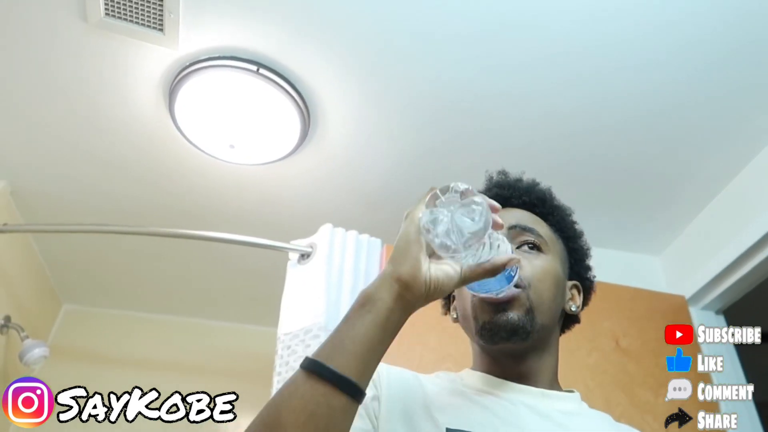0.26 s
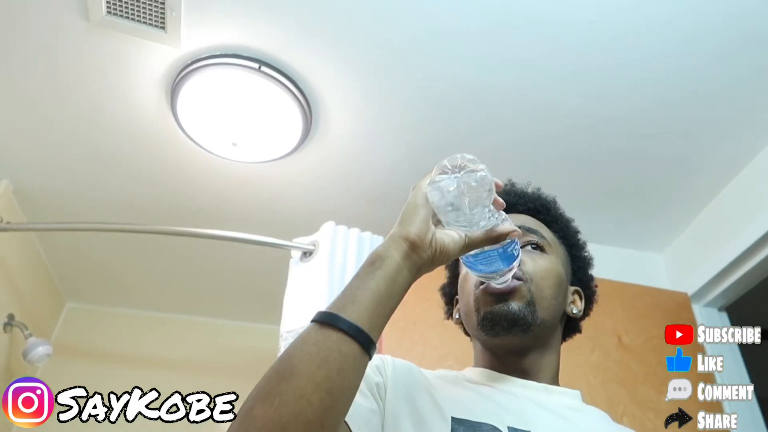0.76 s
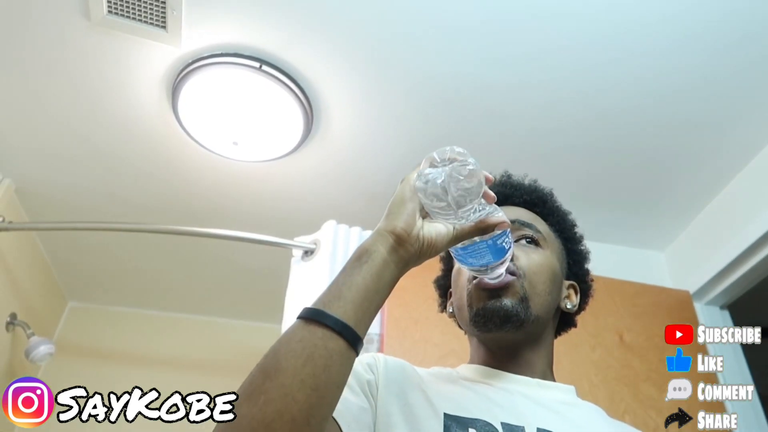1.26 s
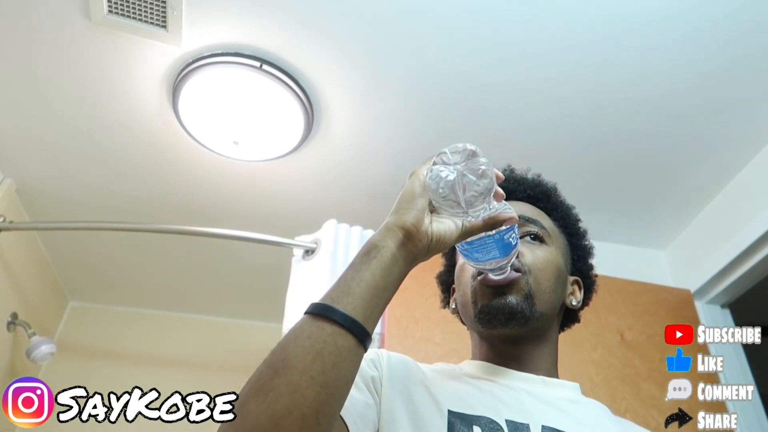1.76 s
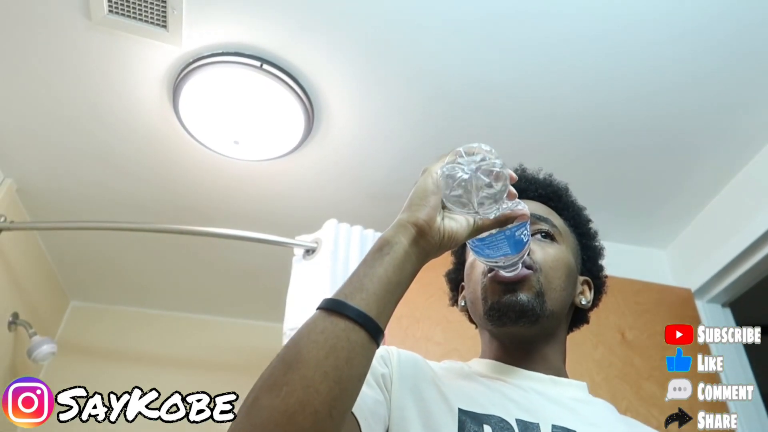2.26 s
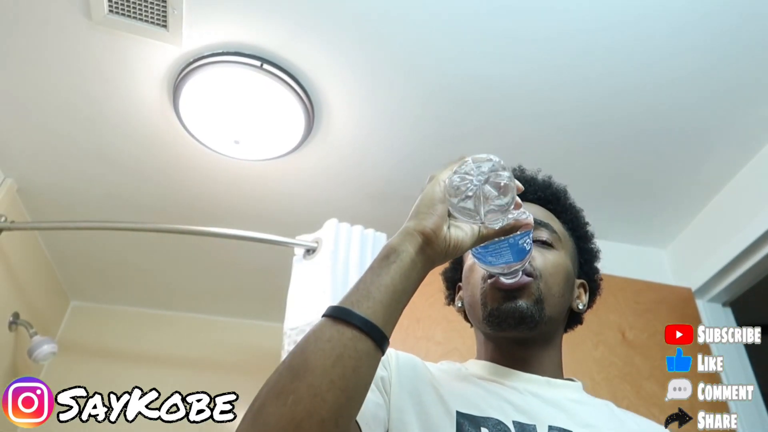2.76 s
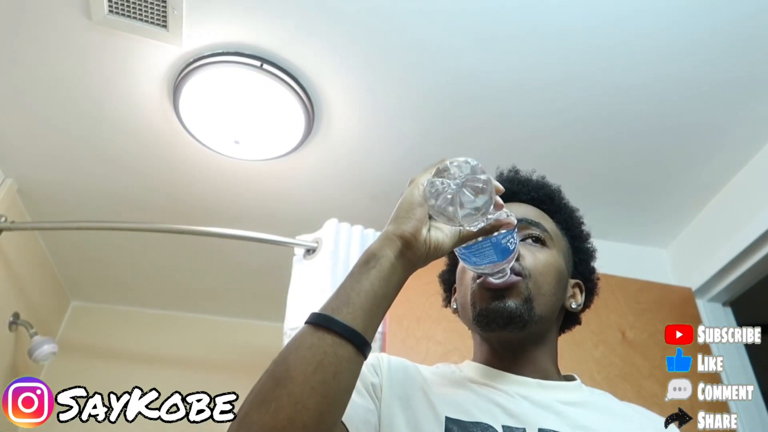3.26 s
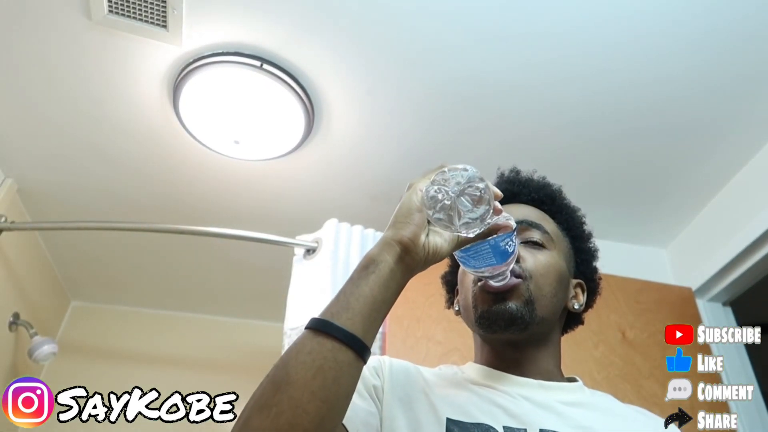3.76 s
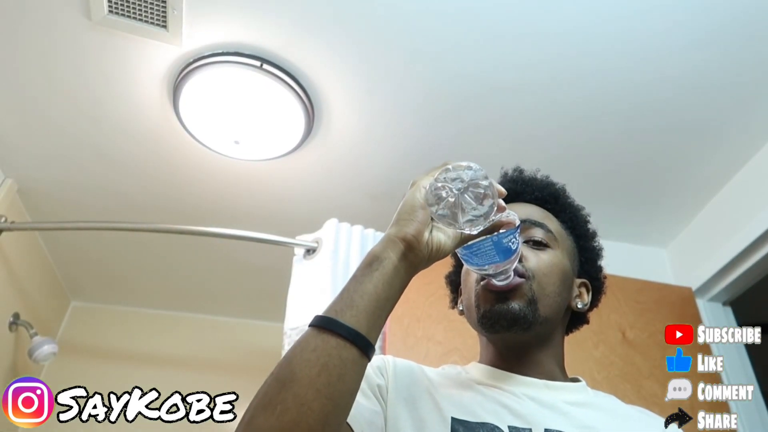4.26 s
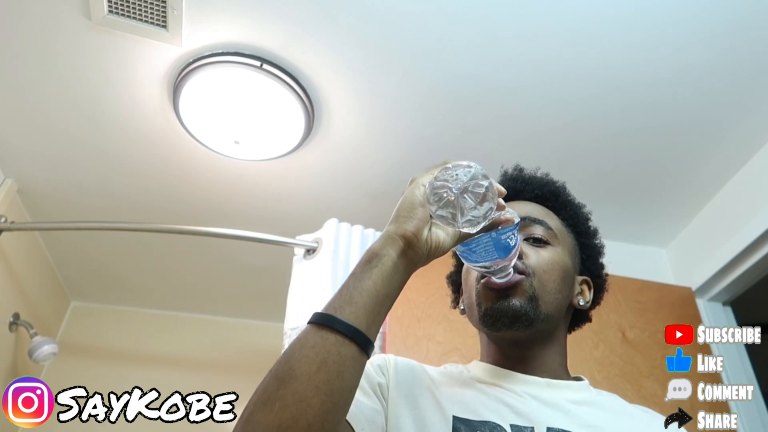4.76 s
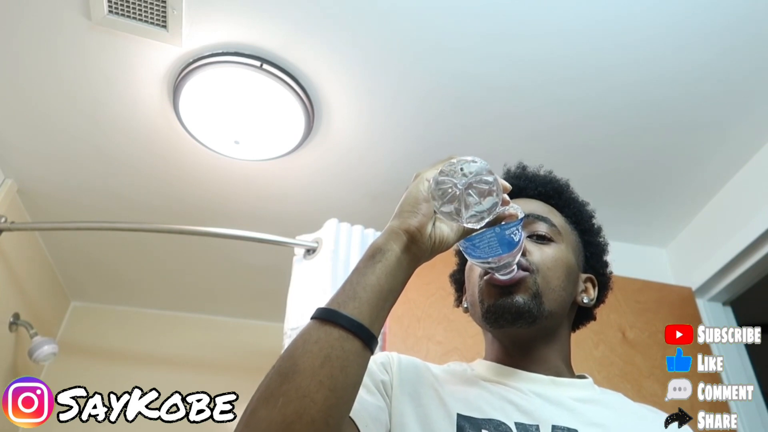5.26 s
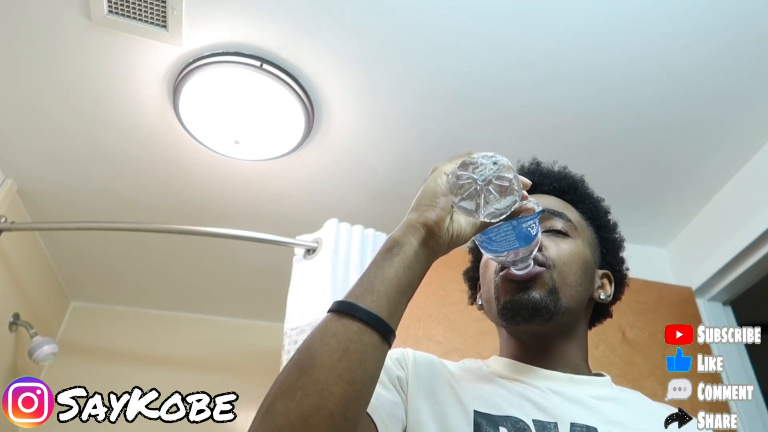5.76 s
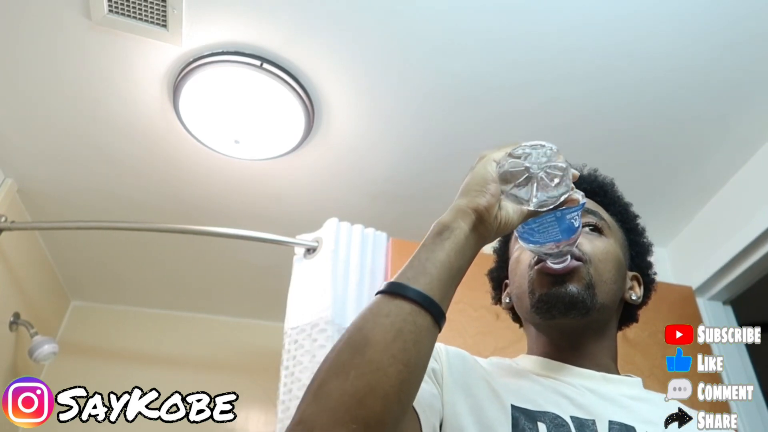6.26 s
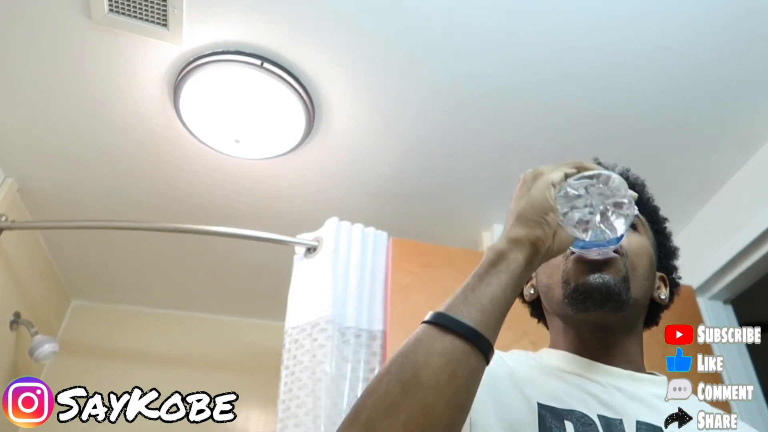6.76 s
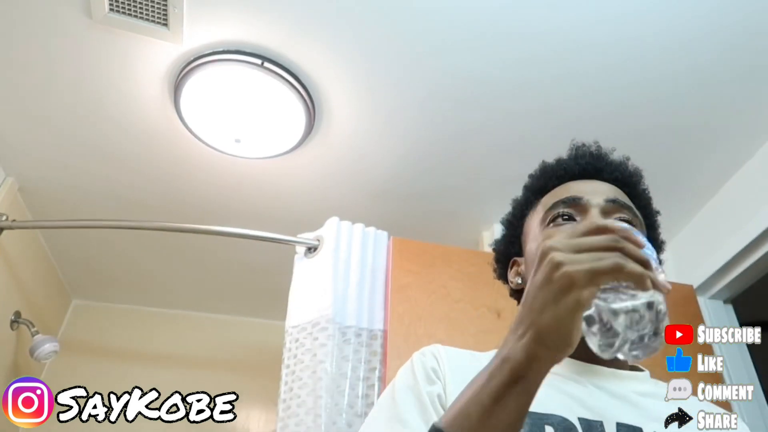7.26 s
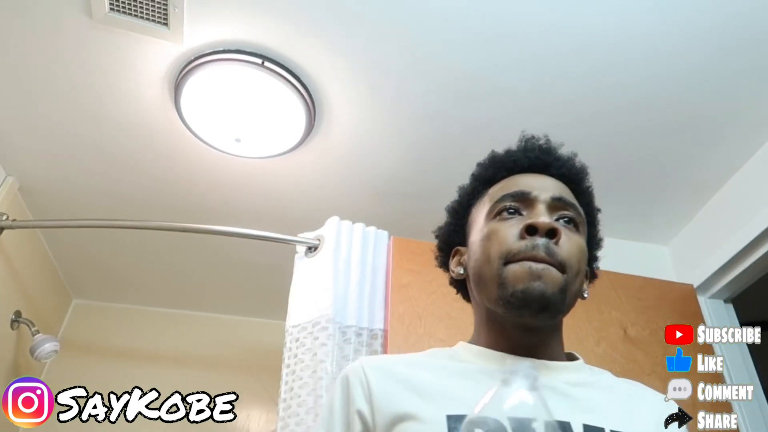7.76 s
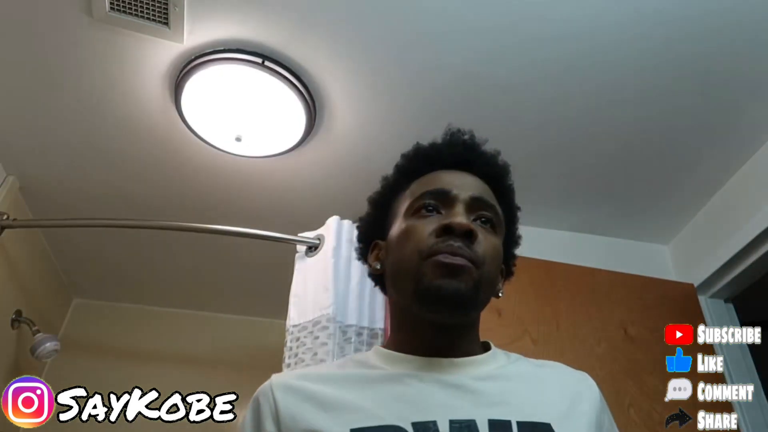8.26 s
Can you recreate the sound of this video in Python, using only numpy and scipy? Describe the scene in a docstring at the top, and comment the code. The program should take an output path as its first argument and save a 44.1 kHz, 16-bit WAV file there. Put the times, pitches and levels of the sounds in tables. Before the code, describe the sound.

Crisp buckling pops, small glugs and short creaks of a flimsy drinking bottle, close up in a hard-walled room over steady fan noise.

```python
"""In a small hard-walled room with a fan running, a thin plastic bottle is squeezed and drunk from.
Its wall buckles in sharp pops, made of clicks coloured by the wall, the dent and the air inside.
Creaks are runs of small pops; short rising tones make glugs, thumps, ticks and chirps; the label rustles.
The walls answer each sound with echoes and a dense tail; the fan is broad noise with narrow hums.
Two close microphone ports hear the bass alike and the treble nearly opposite."""
import sys
import numpy as np
from scipy import signal
from scipy.fft import rfft, irfft, next_fast_len
from scipy.io import wavfile

SR = 44100
rng = np.random.default_rng(int(sys.argv[2]) if len(sys.argv) > 2 else 0)


def store_wav(level_fs):
    """Save 16-bit WAV to argv[1]."""
    pcm = np.round(np.clip(np.atleast_2d(level_fs), -1, 1) * 32767)
    wavfile.write(sys.argv[1], SR, pcm.T.astype(np.int16))


N = 375291  # length in samples, about 8.5 s


def amp(db):
    """Turns dB into a plain factor."""
    return 10 ** (np.asarray(db) / 20)


def evened(x):
    """Scales a sound to an average (RMS) level of 1."""
    return x / np.sqrt(np.mean(x ** 2) + 1e-20)


def read(points, hz):
    """Reads a curve of (Hz, value) at any pitch, straight between points on a log pitch scale."""
    point_hz, value = np.transpose(points)
    return np.interp(np.log(hz + 1), np.log(point_hz + 1), value)


def add(mix, start_s, sound):
    """Adds a sound into the mix at a start time, cut off where the mix ends."""
    part = mix[round(start_s * SR):][:len(sound)]
    part += sound[:len(part)]


def resonate(x, hz, width):
    """Shifts hz down to zero, smooths twice and shifts back: a steep resonance."""
    turn = np.exp(2j * np.pi * hz * np.arange(len(x)) / SR)
    r = np.exp(-np.pi * width / SR)
    smooth = signal.lfilter([(1 - r) ** 2], [1, -2 * r, r * r], x / turn)
    return 2 * (turn * smooth).real


def colour(x, points):
    """Filters a sound by a spectrum of (Hz, dB)."""
    size = next_fast_len(N)
    gain = amp(read(points, np.fft.rfftfreq(size, 1 / SR)))
    return irfft(rfft(x, size) * gain, size)[:N]


# The tone of the moving air. Each row: pitch in Hz, relative level per Hz in dB.
AIR_TONE = [(12, -45), (20, -57), (43, -2.5), (70, -9), (113, -4), (154, -7), (210, -10.5), (262, -14.5),
            (301, -10.5), (367, -14), (527, -21.5), (897, -24.5), (1290, -30.5), (11400, -49.5),
            (16000, -49)]
# The hums of motor and duct. Each row: pitch in Hz, width in Hz, level in dB.
HUMS = [(63, 35, -51), (102.2, 4.9, -52.5), (118.8, 18.2, -44.5), (319.2, 12.8, -60), (367, 4.5, -53.5),
        (394, 5, -68)]
# How far left and right differ in the air noise. Each row: pitch in Hz, difference over sum in dB.
AIR_SIDE = [(60, -70), (180, -16), (550, -7.5), (1650, -1), (4970, 0.5), (15000, 2)]
AIR_DB = -44.5


def fan():
    """Moving air is broad noise; the motor and duct hum in narrow, wavering bands. Gives mid and side."""
    mid, side = (evened(colour(noise, AIR_TONE)) for noise in rng.standard_normal((2, N)))
    hum = np.zeros(N)
    for hz, width, db in HUMS:
        hum += amp(db) * evened(resonate(rng.standard_normal(N), hz, width))
    return amp(AIR_DB) * mid + hum, amp(AIR_DB) * colour(side, AIR_SIDE)


# How long the room rings. Each row: pitch in Hz, time to fall by 60 dB in seconds.
RING_TIMES = [(300, 0.66), (800, 0.49), (2100, 0.37), (5500, 0.37), (12000, 0.24)]


def room_tails(tail_db):
    """Six dense tails of random echoes, each pitch dying at its own pace."""
    length, spacing = SR * 6 // 10, 10  # in samples: one echo in every stretch of 10
    taps = np.zeros((6, length))
    jitter = rng.integers(0, spacing, (6, (length - 1) // spacing))
    at = np.arange(0, length - spacing, spacing) + jitter
    np.put_along_axis(taps, at, rng.choice([-1., 1.], at.shape), 1)
    hz, t, spectrum = signal.stft(taps, SR, nperseg=256)
    decay = amp(-60 * t / read(RING_TIMES, hz)[:, None])
    tails = signal.istft(spectrum * decay, SR, nperseg=256)[1][:, :length]
    t = np.arange(length) / SR
    tails *= (1 - np.exp(-t / 0.00088)) * (1 + 1.21 * np.exp(-t / 0.021))  # builds up, strongest early
    return tails * amp(tail_db) / np.linalg.norm(tails, axis=1, keepdims=True)


# The straight path, then the single echoes. Each row: delay in seconds, level in dB.
NEAR_ECHOES = [(0, -3), (.0021, -5), (.0039, 0), (.0053, -6), (.0065, -7), (.0095, -11), (.013, -12)]
DIRECT_CUT_HZ, DIRECT_CUT = 1600, 0.57  # the straight path arrives thin: corner, share of the bass lost
# While the bottle is held up, one near surface throws it back harder.
LOWERED_S, RAISED_ECHO_S, RAISED_ECHO_DB = 7.4, .0039, -9


def room(x, tail_db):
    """Near surfaces send single echoes, then a dense tail; six tails take turns as the bottle moves."""
    toward_ports, all_round = x
    tails = room_tails(tail_db)
    r = np.exp(-2 * np.pi * DIRECT_CUT_HZ / SR)
    bass = (1 - r) * r ** np.arange(60)
    near = np.zeros(1000)
    add(near, 0, -DIRECT_CUT * amp(NEAR_ECHOES[0][1]) * bass)
    for delay_s, db in NEAR_ECHOES:
        add(near, delay_s, amp([db]))
    # 7.3 tails a second come round, each fading smoothly into the next
    away = (7.3 * np.arange(N) / SR + np.arange(6)[:, None]) % 6 - 3
    turn = np.cos(np.pi / 2 * np.clip(away, -1, 1)) ** 2
    out = signal.oaconvolve(all_round * turn, tails, axes=1)[:, :N].sum(0)
    out += signal.oaconvolve(toward_ports, near)[:N]
    add(out, RAISED_ECHO_S, amp(RAISED_ECHO_DB) * toward_ports[:round(LOWERED_S * SR)])
    return out


# Fingers shift on the label. Each row: time in seconds, level in dB, gliding from row to row.
RUSTLE_LEVELS = [(0, -91), (1.2, -67.5), (1.4, -105), (1.648, -68), (3.2, -99), (3.301, -65.5),
                 (3.38, -100), (3.5, -61), (3.62, -103), (3.9, -71), (3.96, -60), (4.12, -71.5),
                 (4.25, -73), (4.8, -91), (6.85, -100), (6.93, -71.5), (7.2, -68), (7.5, -72), (7.6, -53),
                 (7.749, -86), (7.9, -63), (8.25, -74), (8.38, -67), (8.51, -90)]


def label_rustle():
    """Random grains ring six patches of label, each at its own pitch, with a fainter high band."""
    grains_per_s = 400
    grains = rng.standard_normal((6, N)) * (rng.random((6, N)) < grains_per_s / SR)
    patches = sum(resonate(patch, hz, 650) for patch, hz in zip(grains, np.linspace(1200, 3100, 6)))
    high = resonate(grains.sum(0), 5600, 4000)
    rustle = evened(evened(patches) + amp(-17.5) * evened(high))
    return rustle * amp(np.interp(np.arange(N) / SR, *np.transpose(RUSTLE_LEVELS)))


def rising_tone(db, hz):
    """A tone rings briefly, rising in pitch; lower tones ring longer."""
    t = np.arange(3000) / SR
    decay_s = 0.0027 + 0.59 / hz  # a least time plus part of a cycle
    tone = np.sin(2 * np.pi * hz * (t + 3. * t ** 2))
    return amp(db) * tone * np.exp(-t / decay_s) * (1 - np.exp(-t / .001))


# Short rising tones: low glugs and thumps, small ticks and high chirps.
# Each row: start in seconds, level in dB, starting pitch in Hz.
SHORT_TONES = [(0.01, -29.5, 424), (1.222, -28.5, 262), (1.5, -52, 504), (1.4, -42, 370), (1.5, -52, 580),
               (3.026, -38.5, 776), (3.596, -39, 420), (3.627, -42, 424), (3.915, -48.5, 6300),
               (6.09, -43, 890), (6.945, -37, 443), (7.022, -42, 3950), (7.35, -44, 550), (7.58, -30, 420)]


def short_tones():
    """Each tone sounds the same toward the microphone and all round. Rows of start and sound."""
    return [(start_s, np.tile(rising_tone(db, hz), (2, 1))) for start_s, db, hz in SHORT_TONES]


def clicks():
    """One click and a few weaker ones as neighbouring folds give way; total energy 1."""
    folds, folds_s = .17, .005  # strength of the neighbouring folds, how soon they die in seconds
    luck, t = rng.standard_normal((2, 900)), np.arange(900) / SR
    train = folds * luck[0] * (abs(luck[1]) > 2) * np.exp(-t / folds_s)
    train[0] = 1
    return train / np.linalg.norm(train)


def peaks(hz, centres):
    """Resonance heights in dB from rows (Hz, height dB)."""
    spread = 0.1  # relative width of a resonance
    return sum(height / (1 + (np.log((hz + 1) / centre) / spread) ** 2) for centre, height in centres)


# How strongly the thin wall sends out a click. Each row: pitch in Hz, level in dB.
WALL = [(120, 12.5), (250, 28.5), (400, 39), (490, 32), (620, 34), (790, 35), (1050, 24), (1500, 17.5),
        (2200, 12.5), (3000, 15), (4800, 20.5), (6000, 19), (6800, 17), (8000, 15.5), (11000, 9.5),
        (16000, -2)]
HOLLOW_HZ, KNOCK_HZ = 800, 2200  # pitch of the air inside; above the second, its part has faded and the treble slope begins
DENT_ALL_ROUND = .45  # share of a dent's resonance height that spreads to the far walls
HOLLOW_ALL_ROUND_DB = -1  # the air inside rings slightly weaker all round


def pop(db, hollow_db, thump_db, slope_db, dent_hz, dent_db, other_hz, other_db, more=()):
    """Clicks ring the wall, the dent and the air inside: one row toward the microphone, one all round."""
    hz = abs(np.fft.fftfreq(2048, 1 / SR))
    low_db = read([(HOLLOW_HZ / 2, hollow_db + thump_db), (HOLLOW_HZ, hollow_db), (KNOCK_HZ, 0)], hz)
    treble_db = slope_db * np.clip(np.log2((hz + 1) / KNOCK_HZ), 0, 2)
    shared_db = read(WALL, hz) + db + low_db + treble_db + peaks(hz, more)
    dent_peaks_db = peaks(hz, [(dent_hz, dent_db), (other_hz, other_db)])
    hollow_cut_db = HOLLOW_ALL_ROUND_DB / (1 + (np.log((hz + 1) / HOLLOW_HZ) / 0.22) ** 2)
    all_round_db = DENT_ALL_ROUND * dent_peaks_db + hollow_cut_db
    log_gain = np.log(amp(shared_db + np.array([dent_peaks_db, all_round_db])))
    # the phase follows from the log gain, so that nothing rings before the click
    ring = np.fft.ifft(np.exp(np.conj(signal.hilbert(log_gain)))).real[:, :1024]
    return signal.fftconvolve(clicks()[None], ring, axes=1)


def slips(curve, first_db, last_db):
    """A slip falls on the start and on every whole step of the running slip count: rows (s, dB)."""
    s, rate = np.transpose(curve)
    t = np.arange(s[0], s[-1], 1 / SR)
    count = np.cumsum(np.interp(t, s, rate)) / SR
    at = np.interp(np.arange(int(count[-1]) + 1), count, t)
    return zip(at, np.linspace(first_db, last_db, len(at)))


# A dent rolling under the fingers slips in short steps, one list per creak.
# Each row in a list: time in seconds, slips per second.
CREAK_CURVES = [
    [(5.0478, 16.2), (5.188, 20.5), (5.294, 62.2), (5.375, 30), (5.439, 48.7)],
    [(5.6432, 12), (5.701, 39), (5.76, 18.5)],
    [(6.4197, 52), (6.455, 50), (6.47, 22), (6.5, 33), (6.522, 45)],
]
# The slips of each creak. Each row: first slip in dB, last slip in dB, then as in the pops below
# from the hollow part on: hollow part in dB, octave below in dB, treble slope in dB per octave,
# resonance in Hz, its height in dB, second resonance in Hz, its height in dB.
CREAK_LEVELS = [(-35.5, -34.5, -12.5, -17, -9, 2220, 9.2, 3530, 5.3),
                (-27.5, -29, -16, -25, -13, 1600, 12, 2700, 4.1),
                (-23, -18, -22.5, -14, -15, 3300, 4.6, 6100, 6.9)]
# Peaks added to every slip, all round: a ring at 4900 Hz and a bright hiss above.
# Each row: pitch in Hz, height in dB.
SLIP_PEAKS = [(4900, 5.5), (10300, 11.5), (13500, 14)][:2]


def creaks():
    """A creak is a run of small pops, one for each slip of the dent. Rows of start and sound."""
    rows = []
    for curve, (first_db, last_db, *columns) in zip(CREAK_CURVES, CREAK_LEVELS):
        for start_s, db in slips(curve, first_db, last_db):
            rows.append((start_s, pop(db, *columns, more=SLIP_PEAKS)))
    return rows


# The buckling pops. Each row: start in seconds, strength in dB, how far the hollow part (the pushed air
# inside) stands above the strength in dB, the octave below above the hollow part in dB, treble slope in
# dB per octave, then two resonances of the dent that gives way: first resonance in Hz, its height in dB,
# second resonance in Hz, its height in dB.
POPS = [(0.012, -33.5, -13.5, -21, -23, 1030, 12, 2500, 8), (0.1928, -38, -2, -12, -31, 1100, 8, 1800, 6),
        (0.2098, -18.5, -18, -23, -19, 1800, 3, 5000, 5),
        (0.289, -14.5, -16, -4, -15.5, 1890, 12.5, 880, 5), (0.3183, -31.5, -5, -7, -2, 1710, 24, 6000, -6),
        (0.332, -8, -17, -16, -13, 1740, 5.5, 920, 4), (0.5547, -39, -2, -34, -13.5, 1544, 10, 6060, 15),
        (.6898, -34.5, -12, 0, -20, 2270, 11, 3800, 11),
        (0.7028, -3.5, -18.5, -13.5, -15.5, 1080, 15, 2000, 1),
        (0.859, -45, -16, -22, 3, 11200, 21, 4000, 6), (.988, -7, -16, -15, -9, 2130, 12, 1540, 3),
        (1.2275, -38.5, 1.5, -1, -21, 1000, -2, 2520, 5), (1.2409, -22.5, -6, -9.5, -23, 780, 8.5, 2940, 6),
        (1.323, -34, -27, -17, -25, 2440, 13, 1000, 1), (1.3558, -31, -9, -2, -29, 1500, 5, 2800, 7),
        (1.3748, -20.5, -17.5, -23, -24, 2000, -1, 4500, -3),
        (1.4194, -21.5, -1.5, -26, -12.5, 2400, 10.5, 800, 3.5),
        (1.5687, -30, 2, 1.5, -24, 1830, 7.5, 2540, 10),
        (1.721, -9.5, -21, -8.5, -9.5, 2380, 13.5, 824, 20), (1.8824, -21, -6, -29, -16, 2410, 9, 770, 7.5),
        (2.2083, -13, -20, -7.5, -18, 2200, 5.5, 2860, 13.5),
        (2.583, -17.5, -23, -34, -29, 2700, 13, 970, 8.5), (3.419, -44, -26, -14, -6, 3680, 12, 1800, 5),
        (3.461, -41, -15, 5, -4, 2560, 19, 5000, -12),
        (3.5913, -11.5, -17, -2, -17.5, 3430, 13.5, 4220, 14),
        (3.529, -45.5, -13, -8, -5, 2900, 8, 1800, 5), (3.7326, -40.5, -23, -16, -8, 9700, 15, 4570, -1),
        (3.7623, -31, -6, -32, -21, 810, 14.5, 2000, -2), (3.8546, -28, -15.5, -11, -25, 1030, 5, 1900, -2),
        (3.9045, -56.5, 13.5, -10, 5, 10200, 11, 6200, -11),
        (4.4393, -26, -34, -14, -29, 2980, 16, 1840, 8), (4.6166, -41, -9, -11, -3.5, 2360, 3, 6000, -1),
        (4.6718, -41, -14, -11, -4.5, 4270, 9, 9300, 9),
        (4.901, -35.5, -34, -19, -18, 2920, 15.5, 1900, -9),
        (5.4487, -8.5, -4.5, -19.5, -20.5, 2230, 12.5, 3480, 7.5),
        (5.4953, -24.5, -6, -6, -11.5, 810, 14, 2100, 15), (5.6052, -28, -11, -6, -10, 2800, 19.5, 680, 6),
        (6.4709, -30, -7, -2, -10, 2420, 4, 5000, 5),
        (6.5247, -17.5, -12, -15, -2.5, 5440, 14.5, 3640, 13.5),
        (6.636, -23, -15.5, -2.5, -9.5, 804, 17.5, 1720, 6),
        (6.776, -32.5, -20, -8, -5, 2070, 16, 5030, -9), (6.8081, -31, -9, -19, -6, 2470, 21, 5000, -7),
        (7.0611, -16.5, -18, -20, -9.5, 2410, 2, 3520, 1.5),
        (7.1289, -29, -31, -4, -17, 1790, 23, 3030, 20), (7.1337, -24, -5, -8, -15, 960, 17, 1740, 2),
        (7.225, -27.5, -18, -18, -10.5, 1240, 12, 4800, -7), (7.4267, -41, -5, 8, -15, 2090, 13, 3720, 10),
        (7.4436, -44, 4.5, 3.5, -31, 1170, 20, 2400, -4),
        (7.5372, -14, -17, -2.5, -1.5, 1870, 17.5, 1090, 15.5),
        (7.577, -43, 8, 1.5, -22, 1070, 5, 2000, -3), (7.6202, -18.5, -11.5, 0.5, -31, 910, 3, 3000, 1),
        (7.6696, -22, -12, -8, -7, 2120, 12, 2800, 2), (7.7774, -8, -21.5, -6, -10, 2150, 6, 666, 13),
        (7.829, -13, -27, -22, -10, 2170, 8, 2980, 0), (7.8541, -9, -13, -6.5, -5, 4800, 8, 680, 5),
        (7.865, -20.5, -5, -10, -2.5, 5400, 3, 700, 13), (7.875, -21.5, -11, -5, -5, 2180, 14, 5200, 0),
        (7.886, -32, -22, -8, -16, 4200, 0, 700, 3), (7.98, -41, -17, 3, -28, 1450, 8, 2400, 0),
        (7.933, -18.5, -18, 0.5, -34, 1250, 26, 3000, 5)]


def pops():
    """Each dent that gives way makes one pop with its own colour. Rows of start and sound."""
    return [(start_s, pop(*columns)) for start_s, *columns in POPS]


def bottle():
    """All bottle sounds in two rows: as sent to the microphone, and as spread all round."""
    out = np.zeros((2, N))
    for start_s, sound in pops() + creaks() + short_tones():
        add(out.T, start_s, sound.T)
    return out + label_rustle()


# How far left and right differ for the bottle. Each row: pitch in Hz, level in dB.
BOTTLE_SIDE = [(60, -14), (150, -30), (380, -28), (950, -24.5), (2380, -17.5), (5980, -3), (9000, 3),
               (15000, 18)]


def bottle_in_room():
    """The bottle as the two ports hear it: mid is what they share, side is what differs."""
    dry_bottle = bottle()
    mid = room(dry_bottle, tail_db=8.5)
    side = colour(room(dry_bottle, tail_db=11.5), BOTTLE_SIDE)
    # the ports differ in arrival time: a quarter turn of phase
    side = signal.hilbert(side, next_fast_len(N)).imag[:N]
    side -= 0.024 * mid  # the right port is a little louder
    return mid, side


def scene():
    """Bottle and fan together, left and right."""
    mid, side = bottle_in_room()
    air_mid, air_side = fan()
    return np.array([mid + air_mid + side + air_side, mid + air_mid - side - air_side])


# How the microphone dulls the treble. Each row: pitch in Hz, level in dB.
MICROPHONE = [(20, 0), (8500, 0), (11000, -4), (13000, -9), (15000, -16), (16000, -32)]
EDGE_HZ = 16400  # top of the band


def record(dry):
    """The treble falls away; then the band limit."""
    dulled = np.array([colour(x, MICROPHONE) for x in dry])
    band_limit = signal.firwin(511, EDGE_HZ, window=("kaiser", 9), fs=SR)
    return signal.oaconvolve(dulled, band_limit[None], "same")


dry = scene()
out = record(dry)
store_wav(out)
```